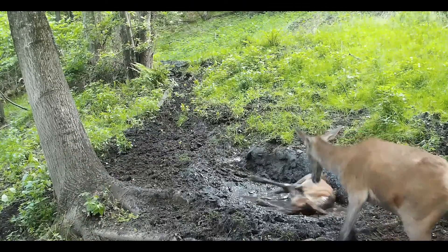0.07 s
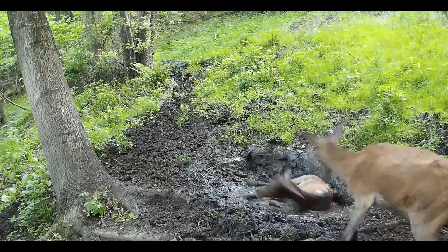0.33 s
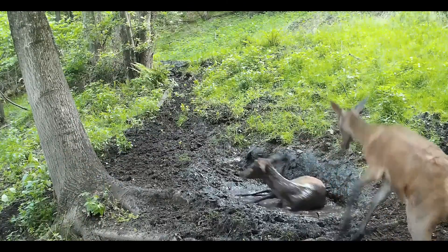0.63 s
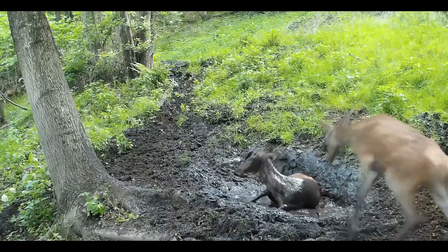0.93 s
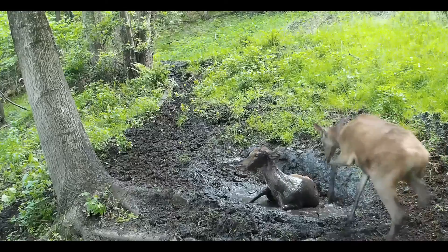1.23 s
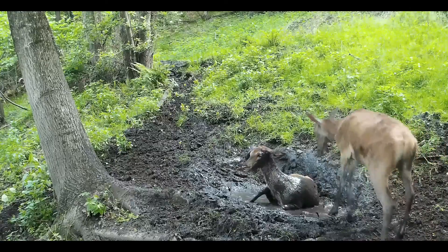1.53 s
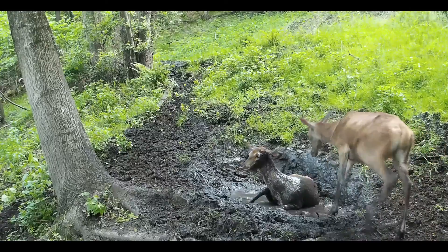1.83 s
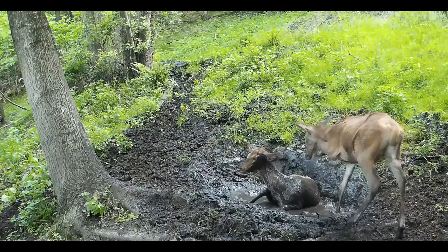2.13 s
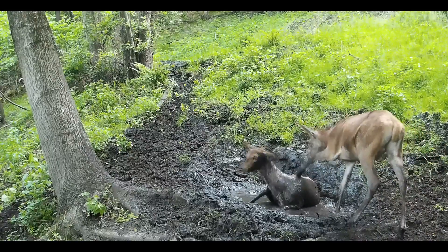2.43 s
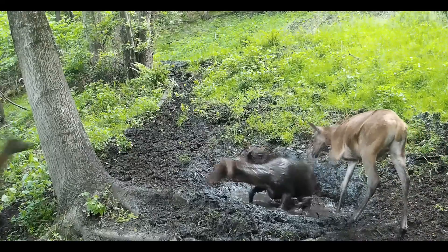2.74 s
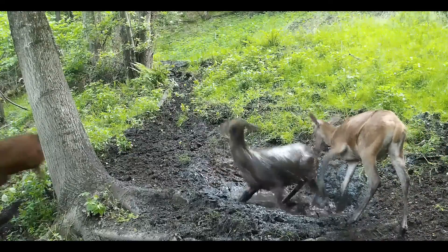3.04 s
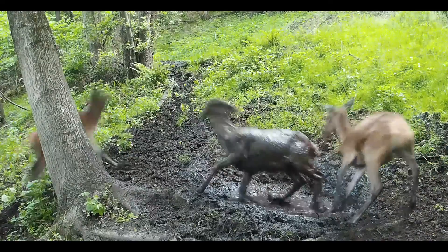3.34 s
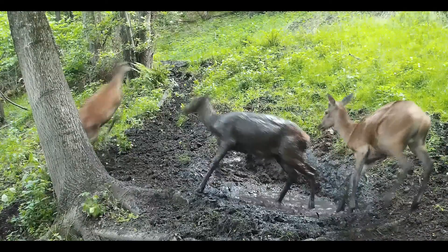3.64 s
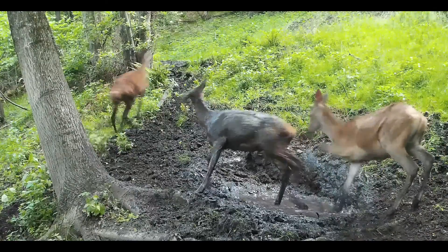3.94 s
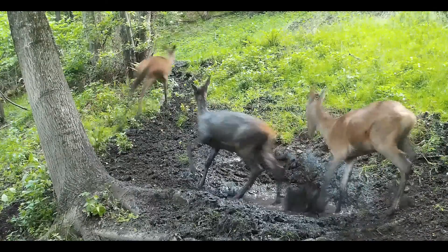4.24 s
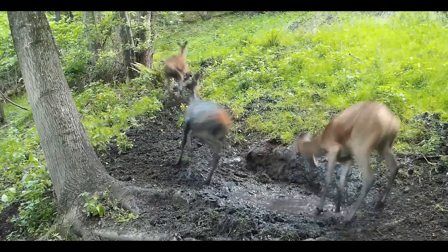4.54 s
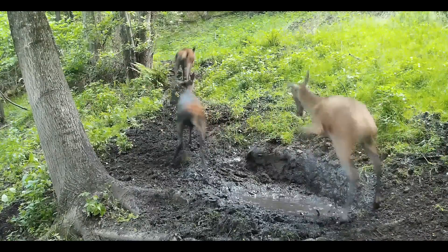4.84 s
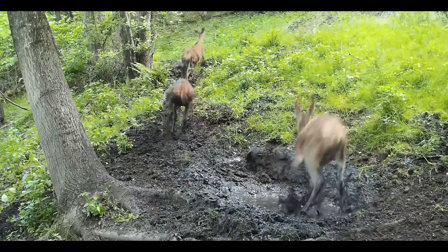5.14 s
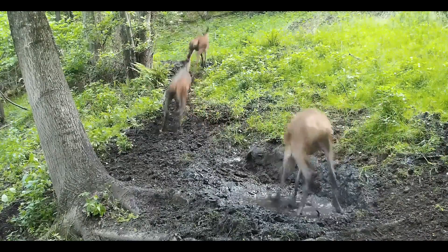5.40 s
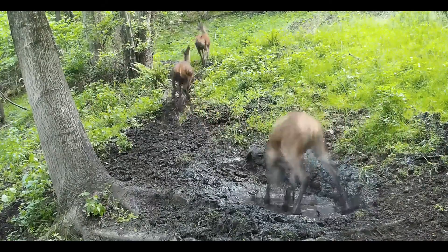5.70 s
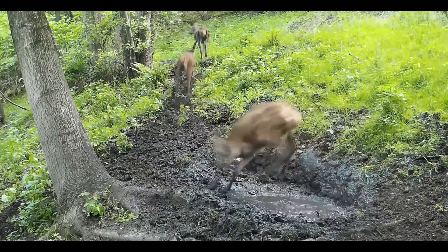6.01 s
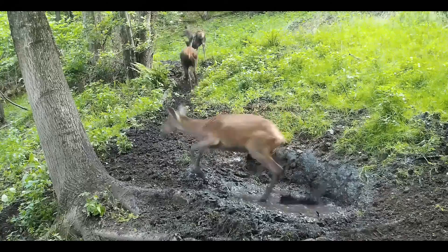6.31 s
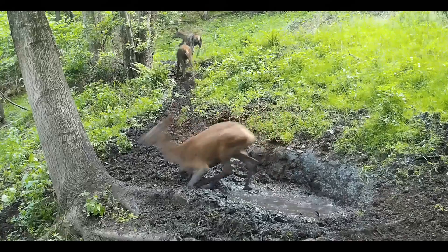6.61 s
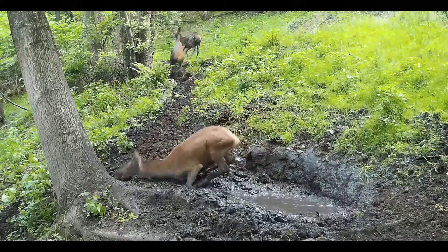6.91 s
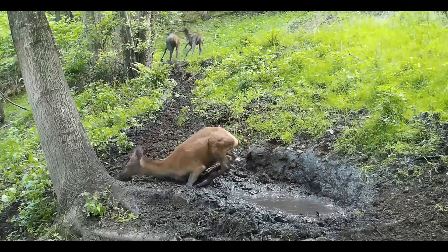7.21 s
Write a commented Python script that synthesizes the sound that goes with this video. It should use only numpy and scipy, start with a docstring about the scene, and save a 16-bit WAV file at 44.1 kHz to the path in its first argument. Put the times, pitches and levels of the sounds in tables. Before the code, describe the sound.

Deer wallow and scramble in a forest mud puddle, with wet slaps, sucking pops and sloshes over a soft hiss of leaves.

```python
"""Wet pops, slaps and sloshes: deer wallow and scramble in a forest mud puddle a few metres away.
Hooves slap the slurry and thud on soft ground. Suction pockets pop as their mud films tear, air gulps
up, flecks land, and the stirred mud crackles and gurgles. The trees answer faintly, over distant
birds, a steady hiss of leaves and a low rumble of air."""
import sys
import numpy as np
from scipy import signal
from scipy.fft import rfft, irfft, next_fast_len
from scipy.io import wavfile
from scipy.ndimage import map_coordinates

SR = 44100
rng = np.random.default_rng(int(sys.argv[2]) if len(sys.argv) > 2 else 0)


def int16_out(signal):
    """Quantize to a 16-bit WAV file."""
    q = np.round(np.clip(np.atleast_2d(signal).T, -1, 1) * 32767)
    wavfile.write(sys.argv[1], SR, q.astype(np.int16))


N = 324576

# Spectrum of mud films and drops. Each row: frequency in Hz, relative level in dB.
SPRAY_SPECTRUM = [(200, -29), (900, -27), (1800, -8.5), (2800, -5), (3200, 2), (4100, 0), (4600, 0.5),
                  (5100, 1.5), (6200, -1), (7200, -1), (9000, -9), (12000, -15), (15500, -23.5)]
# Spectrum of hollows in the mud. Each row: frequency in Hz, relative level in dB.
CAVITY_SPECTRUM = [(150, -19), (800, -19), (1100, -10.5), (1500, -5), (2200, -6.5), (2800, -12),
                   (6000, -41), (15000, -78)]


def amp(db):
    """Decibels to gain."""
    return 10 ** (np.asarray(db) / 20)


def unit(x):
    """Scale to rms 1."""
    return x / np.sqrt(np.mean(x ** 2) + 1e-20)


def along(points, hz):
    """(Hz, value) points read on a log axis."""
    knot_hz, values = np.transpose(points)
    return np.interp(np.log(hz + 1), np.log(knot_hz + 1), values)


def wobble(rate_hz, size=N):
    """Smooth random curve, rate_hz knots a second."""
    at = np.arange(size) * rate_hz / SR
    return map_coordinates(rng.standard_normal(size // 8 + 8), [at], mode="mirror")


def colour(x, spectrum, size=4096):
    """Minimum-phase filter; white noise keeps its power."""
    gain = amp(along(spectrum, np.fft.rfftfreq(size, 1 / SR)))
    cepstrum = irfft(np.log(gain))
    cepstrum[1:size // 2] *= 2
    cepstrum[size // 2 + 1:] = 0
    kernel = irfft(np.exp(rfft(cepstrum)))
    return signal.fftconvolve(x, kernel / np.linalg.norm(kernel))[:len(x)]


def add(track, start_s, sound):
    """Mix a sound into a track."""
    start = max(round(start_s * SR), 0)
    track[start:start + len(sound)] += sound[:max(N - start, 0)]


def strike(t, rise_s, t60_s):
    """Quick rise, exponential fall, peak 1."""
    shape = (1 - np.exp(-t / rise_s)) * amp(-60 * t / t60_s)
    return shape / shape.max()


def burst(envelope, spectrum, grit_db, grain_hz):
    """Coloured noise in clumped grains, with the energy of its envelope."""
    size = len(envelope)
    grains = envelope * rng.standard_normal(size) * amp(grit_db * wobble(grain_hz, size))
    return unit(colour(grains, spectrum)) * np.sqrt(np.mean(envelope ** 2))


def sized_spray(centre_hz, boost_db, log_width):
    """Spray spectrum with a hump for films or drops of one size; fine ones also lift the treble."""
    hz = np.geomspace(100, 16000, 70)
    hump_db = boost_db * np.exp(-(np.log(hz / centre_hz) / log_width) ** 2)
    fine_hz = 4530
    tilt_db_per_octave = 7.5 * max(np.log2(centre_hz / fine_hz), 0)
    lift_db = tilt_db_per_octave * np.maximum(np.log2(hz / fine_hz), 0)
    return np.column_stack([hz, along(SPRAY_SPECTRUM, hz) + hump_db + lift_db])


def sweeps(rows, waver):
    """Short, unsteady tones whose pitch bends ever faster."""
    track = np.zeros(N)
    for start_s, db, start_hz, end_hz, length_s in rows:
        u = np.linspace(0, 1, max(round(length_s * SR), 8))
        hz = start_hz * (end_hz / start_hz) ** (u ** 2) * (1 + waver * wobble(675, len(u)))
        swell = unit((1 - np.exp(-u / 0.071)) * (1 - u ** 3) * amp(2.0 * wobble(215, len(u))))
        add(track, start_s, amp(db - 1.5) * swell * np.sin(2 * np.pi * np.cumsum(hz) / SR))
    return track


def forest():
    """Leaves hiss steadily over a low rumble of moving air."""
    # Each row: frequency in Hz, relative level in dB.
    leaf_spectrum = [(12, -17), (20, -5.5), (70, 2), (148, -4), (213, -6.5), (333, -8), (534, -11),
                     (958, -17), (1580, -18), (3000, -16), (3540, -37), (3960, -13.5), (6540, -14.5),
                     (11100, -34.5), (15500, -37)]
    air_spectrum = [(20, -9.0), (45, 1.5), (110, -21.0), (250, -17.5), (700, -30.5)]
    # Each row: time in seconds, rumble level in dB.
    breeze = [(0.0, -59), (1.4, -54.5), (2.8, -55), (3.1, -47.5), (4.4, -53), (5.1, -54), (7.36, -56)]
    hiss = unit(colour(rng.standard_normal(N), leaf_spectrum)) * amp(-49.0 + 0.23 * wobble(4.04))
    air = unit(colour(rng.standard_normal(N), air_spectrum))
    air_db = np.interp(np.arange(N) / SR, *np.transpose(breeze)) + 1.5 * wobble(7)
    return hiss + air * amp(air_db)


def birds():
    """Faint chirps far off in the wood."""
    # Each row: start in seconds, level in dB, start and end pitch in Hz, length in seconds.
    chirps = [(.03, -50, 3640, 3380, .05), (.255, -53, 2750, 2920, 0.071), (.69, -52, 2380, 2300, 0.114)]
    return sweeps(chirps, waver=0.012)


def trees(x):
    """Trunks and foliage scatter a late tail."""
    # Each row: frequency in Hz, t60 in seconds.
    echo_decay = [(100, 0.2), (1500, 0.12), (5000, 0.18), (14000, 0.16)]
    hz, t, noise = signal.stft(rng.standard_normal(SR // 2), SR, nperseg=256)
    decay = amp(-60 * t / along(echo_decay, hz)[:, None])
    tail = signal.istft(noise * decay, SR, nperseg=256)[1]
    tail *= 1 - np.exp(-np.arange(len(tail)) / SR / 0.025)
    return signal.fftconvolve(x, tail / np.linalg.norm(tail))[:N]


def stirring_db(t):
    """How hard the deer stir the puddle: (mud, water) levels at times t."""
    # Each row: time in seconds, sticky mud level in dB, loose water level in dB.
    effort = [(0.0, -54, -57), (0.39, -41.5, -46.5), (0.92, -37.5, -43.5), (1.25, -43, -47),
              (1.6, -45, -56), (2.05, -37, -46.5), (2.33, -49, -56), (2.58, -36.5, -37), (2.9, -33.5, -40),
              (3.13, -27, -32), (3.4, -30.5, -38.5), (3.62, -36, -45), (4.02, -37, -44), (4.3, -32, -38),
              (4.68, -36.5, -43.5), (4.88, -39.5, -56), (5.02, -38.5, -37), (5.25, -29.5, -40.5),
              (5.72, -29.5, -33), (6.17, -37, -50), (6.35, -30.5, -43), (6.54, -42.5, -47.5),
              (7.03, -40, -45), (7.36, -49.5, -61)]
    time_s, mud_db, water_db = np.transpose(effort)
    return np.interp(t, time_s, mud_db), np.interp(t, time_s, water_db)


def spatter():
    """Flecks of mud land as thin, bright ticks; their level loosely follows the stirring."""
    track, t = np.zeros(N), np.arange(SR // 50) / SR
    fleck = strike(t, rise_s=0.0002, t60_s=0.012)
    for when, strength, fineness in rng.random((130, 3)):
        drop = sized_spray(9500 * 2 ** (fineness - 0.5), boost_db=7, log_width=0.22)
        tick = burst(fleck, drop, grit_db=-2.0, grain_hz=1100)
        add(track, when * N / SR, amp(10 * strength) * tick)
    mud_db, _ = stirring_db(np.arange(N) / SR)
    return unit(track) * amp(-57.5 + 0.71 * (mud_db - mud_db.mean()))


def bubbles(centre_hz, log_spread, cycles, glide, spread_db, count, size=1500):
    """Damped bubbles, each rising in pitch as it nears the surface; rms 1."""
    start = rng.integers(0, N, (count, 1))
    hz = centre_hz * np.exp(log_spread * rng.standard_normal((count, 1)))
    strength = amp(spread_db * np.minimum(rng.exponential(size=(count, 1)), 3))
    age = hz * np.arange(size) / SR / cycles
    phase = 2 * np.pi * cycles * age * (1 + glide * age / 2)
    ring = strength * age * np.exp(-4 * age) * np.sin(phase)
    return unit(np.bincount((start + np.arange(size)).ravel(), ring.ravel(), N)[:N])


def crackle(tear_count=700):
    """Tiny sticky films tear in brief rasps, amid fizz and droplets."""
    fizz = unit(rng.standard_normal(N) * amp(0.23 * wobble(750) + 2.7 * wobble(55)))
    starts = rng.integers(0, N, tear_count)
    strength = amp(4 * np.minimum(rng.exponential(size=tear_count), 3))
    tear_power = np.bincount(starts, strength ** 2, N)
    rasp = strike(np.arange(SR // 40) / SR, rise_s=0.00028, t60_s=0.014)
    envelope = np.sqrt(np.abs(signal.fftconvolve(tear_power, rasp ** 2)[:N]))
    ticks = unit(envelope * rng.standard_normal(N))
    droplets = bubbles(4430, log_spread=0.39, cycles=23, glide=0.17, spread_db=8.5, count=1500, size=400)
    return colour(amp(-3.5) * fizz + 0.44 * ticks, SPRAY_SPECTRUM) + amp(-9.5) * droplets


def slosh():
    """Loose water washes about with small bubbles."""
    wash = unit(colour(rng.standard_normal(N) * amp(3.74 * wobble(70)), CAVITY_SPECTRUM))
    froth = bubbles(1780, log_spread=0.219, cycles=14.4, glide=0.09, spread_db=5.5, count=1000)
    return amp(-2.5) * wash + amp(-6.5) * froth


def gurgle():
    """Large bubbles, strongest while a body rolls in the puddle or heaves out."""
    # Each row: time in seconds, level in dB.
    heaves = [(0.0, -57), (0.6, -61), (0.88, -47), (1.25, -51.5), (1.6, -54.5), (2.4, -54.5), (2.64, -46.5),
              (2.95, -57), (3.18, -42), (3.4, -50.5), (4.9, -57), (5.8, -48), (7.36, -60.5)]
    db = np.interp(np.arange(N) / SR, *np.transpose(heaves))
    stream = bubbles(671, log_spread=0.352, cycles=5.2, glide=0.21, spread_db=2.5, count=1200)
    return amp(db - 3) * stream


def churn():
    """Stirred mud crackles, water sloshes and large bubbles gurgle."""
    mud_db, water_db = stirring_db(np.arange(N) / SR)
    return amp(mud_db - 3.5) * crackle() + amp(water_db - 2.0) * slosh() + gurgle()


def gulps(mean_octaves_per_s=35.4):
    """Air pockets shrink as they surface, so their pitch climbs; long ones sweep furthest."""
    # Each row: start in seconds, level in dB, start pitch in Hz, length in seconds.
    air_pockets = [(0.694, -37.5, 2000, 0.008), (0.748, -34.5, 1530, 0.0041), (0.856, -39.5, 545, 0.012),
                   (1.079, -36, 1275, 0.016), (1.172, -37, 1620, 0.01), (2.495, -32.5, 1160, 0.006),
                   (2.639, -33, 1670, 0.01), (2.668, -31, 1080, 0.013), (3.134, -33, 500, 0.0089),
                   (3.183, -32, 410, 0.028), (3.206, -33.5, 686, 0.025), (3.322, -30, 1170, 0.018),
                   (4.631, -30, 1220, 0.01), (5.125, -26, 380, 0.052), (5.224, -26.5, 1550, 0.0093),
                   (5.742, -33.5, 454, 0.018), (5.774, -40, 572, 0.0286), (5.802, -31, 1960, 0.012),
                   (5.929, -25.5, 1330, 0.01), (6.683, -27, 1320, 0.002)]
    rows = [(start_s, db, hz, hz * 2 ** (mean_octaves_per_s * length_s), length_s)
            for start_s, db, hz, length_s in air_pockets]
    return sweeps(rows, waver=0.066)


def thuds():
    """Mud squashes under a hoof; the soft ground gives for a few slow swings."""
    # Each row: start in seconds, squash level in dB, ground push level in dB.
    landings = [(0.201, -30, -56), (0.593, -33.5, -50), (0.946, -45, -43), (1.219, -29, -60),
                (1.25, -37, -46), (2.27, -41, -46), (2.951, -24.5, -60), (3.261, -37, -42),
                (3.708, -27.5, -59), (3.952, -34.5, -62), (4.076, -37, -37), (4.237, -42.5, -42),
                (4.97, -30.5, -54), (5.027, -30, -58), (5.576, -32, -48), (6.027, -19.5, -38),
                (6.232, -19.5, -41), (6.285, -17, -27), (6.481, -38.5, -38.5)]
    # Each row: frequency in Hz, relative level in dB.
    squash_spectrum = [(40, -22), (130, -4), (250, -2.5), (420, -2), (700, -4), (1200, -12.5), (3000, -77)]
    track, t = np.zeros(N), np.arange(SR // 4) / SR
    for start_s, squash_db, push_db in landings:
        squash = burst(strike(t, rise_s=0.0012, t60_s=0.062), squash_spectrum, grit_db=1.5, grain_hz=266)
        ground_hz = 94 * np.exp(0.012 * rng.standard_normal())
        push = strike(t, rise_s=0.0027, t60_s=0.047) * np.sin(2 * np.pi * ground_hz * t)
        add(track, start_s, amp(squash_db - 5) * squash + amp(push_db + 6) * push)
    return track


def slaps():
    """A limb smacks the slurry, opens a hollow and throws spray that patters back."""
    # Each row: start in seconds, level in dB, cavity offset in dB, drop pitch in Hz, t60 in seconds.
    impacts = [(0.4241, -23, -15, 5850, 0.081), (0.6423, -25, -19, 5000, 0.14),
               (0.8438, -35.5, 2, 3320, 0.045), (1.269, -21, -16, 5220, 0.13),
               (1.7963, -14, -34, 3650, 0.08), (1.815, -18, -9, 5900, 0.033), (2.146, -22, -26, 6100, 0.11),
               (2.6, -19, -11.5, 5380, 0.11), (2.6673, -34, -1, 3310, 0.076),
               (2.7472, -13.5, -30, 6000, 0.15), (2.7785, -18, -14, 3580, 0.16),
               (2.8353, -15, -17, 3190, 0.097), (2.9274, -12.5, -30, 5730, 0.1),
               (2.9433, -14, -10.5, 3370, 0.14), (3.1643, -3.5, -21.5, 4930, 0.092),
               (3.4023, -14, -9.5, 4250, 0.041), (3.497, -17, -13, 3190, 0.11),
               (3.7055, -8.5, -12, 5300, 0.08), (3.7185, -12.5, -41, 6400, 0.13),
               (4.0751, -2.5, -21, 5900, 0.14), (4.3127, -22, -9.5, 5330, 0.032),
               (4.4092, -14.5, -18, 5850, 0.053), (4.6318, -28.5, -2, 3670, 0.047),
               (4.9583, -1, -17.5, 3940, 0.085), (4.9706, -10, -16, 5000, 0.056),
               (5.01, -13.5, -10, 5950, 0.068), (5.3633, -11, -15.5, 3330, 0.15),
               (5.5763, -3.5, -21, 3270, 0.065), (5.607, -16, -13, 3390, 0.082),
               (5.9077, -7, -21, 5070, 0.11), (5.921, -12, -13.5, 4500, 0.1),
               (6.03, -1.5, -12.5, 3520, 0.038), (6.049, -15, -9, 3180, 0.21),
               (6.111, -24, -6.5, 4010, 0.12), (6.2673, -10, -29, 3610, 0.069),
               (6.2847, -9, -8, 2970, 0.057), (6.328, -15.5, -10.5, 3610, 0.081),
               (6.4685, -25, -32, 7370, 0.073), (6.529, -23, -15, 3500, 0.063),
               (6.605, -28, -5.5, 3390, 0.071), (6.7508, -22.5, -9.5, 7200, 0.097),
               (6.928, -19.5, -15, 3450, 0.032), (7.3005, -29, -4, 5140, 0.17),
               (7.3291, -16, -15, 3600, 0.23)]
    track, t = np.zeros(N), np.arange(SR // 3) / SR
    for start_s, db, cavity_db, drop_hz, t60_s in impacts:
        drops = sized_spray(drop_hz, boost_db=4.5, log_width=0.095)
        smack = burst(strike(t, rise_s=0.0032, t60_s=t60_s), drops, grit_db=3.5, grain_hz=410)
        patter = burst(strike(t, rise_s=0.0067, t60_s=0.32), SPRAY_SPECTRUM, grit_db=4.0, grain_hz=197)
        hollow = burst(strike(t, rise_s=0.006, t60_s=t60_s), CAVITY_SPECTRUM, grit_db=7.0, grain_hz=241)
        splash = smack + amp(-12.5) * patter
        add(track, start_s, amp(db - 12) * splash + amp(db + cavity_db - 4) * hollow)
    return track


def small_pockets(rate_per_s=4.3):
    """Rows for pops(): lesser pockets open at random, louder where the mud is stirred harder."""
    rows = []
    for when, strength, depth, pitch, film in rng.uniform(-1, 1, (round(rate_per_s * N / SR), 5)):
        start_s = (when + 1) / 2 * N / SR
        mud_db, _ = stirring_db(start_s)
        db, cavity_db = mud_db + 11.5 + 5 * strength, -17.5 + 8 * depth
        cavity_hz, film_hz = 1715 * 2 ** (pitch / 2), 5500 * 2 ** (film / 2)
        rows.append((start_s, db, cavity_db, cavity_hz, film_hz))
    return rows


def pops():
    """A mud film stretches and tears with a tick; the pocket behind rings, rising as it opens."""
    # Each row: start in seconds, level in dB, cavity offset in dB, cavity and film pitch in Hz.
    main_pockets = [(0.201, -18.5, -10, 1120, 3240), (0.4793, -23.5, -12, 1780, 5010),
                    (0.5934, -19.5, -5, 2100, 3180), (0.6083, -17, -35, 2240, 6200),
                    (0.641, -13.5, -30, 2020, 5100), (0.7673, -27.5, -4, 1850, 3570),
                    (1.0976, -13, -13.5, 1840, 4840), (1.2222, -14, -14, 1110, 6300),
                    (1.279, -10.5, -30, 2260, 5340), (1.5355, -17, -28, 1490, 6750),
                    (1.6103, -20.5, -32, 2250, 5770), (1.8005, -12.5, -13.5, 2200, 7450),
                    (2.053, -18, -23, 1270, 5630), (2.089, -31, -2, 2260, 3080),
                    (2.0998, -18, -27, 2390, 7700), (2.256, -4, -11.5, 1480, 4530),
                    (2.416, -33.5, 3, 1400, 3510), (2.445, -18.5, -13.5, 1830, 4830),
                    (2.8469, -10.5, -10.5, 2300, 3520), (2.9518, -9.5, -4, 1540, 3310),
                    (3.0253, -10.5, -12, 1900, 2960), (3.262, -5, -22, 1650, 7340),
                    (3.2721, -8.5, -18, 1870, 6000), (3.477, -6, -16, 1500, 4860),
                    (3.7606, -5.5, -20.5, 2280, 5700), (3.7735, -8, -24, 2100, 5880),
                    (3.9515, -11, -17, 2240, 6760), (3.9995, -12, -21.5, 1320, 4740),
                    (4.0824, 3.5, -18.5, 1410, 3220), (4.1141, -13, -3.5, 1570, 3230),
                    (4.205, -12.5, -36, 1350, 6870), (4.344, -13.5, -8.5, 1810, 4040),
                    (4.4157, -12.5, -25, 1450, 5730), (4.7705, -12, -27, 1290, 5600),
                    (4.8574, -14.5, -17.5, 1380, 6800), (4.882, -12, -30, 1520, 6000),
                    (4.9304, -13, -22, 1880, 4970), (4.9625, 4, -37, 2140, 3940),
                    (5.027, -2.5, -13.5, 1580, 3370), (5.114, -13, -34, 1610, 7050),
                    (5.1713, 3.5, -26, 2440, 5900), (5.3495, -1.5, -24, 1840, 3400),
                    (5.3788, -2.5, -20, 1600, 3330), (5.4188, -4.5, -13, 1880, 3580),
                    (5.5854, -1, -18, 1660, 4100), (5.7196, -14.5, -4.5, 2060, 3480),
                    (6.0123, -1.5, -20.5, 1690, 7360), (6.2326, 3, -23, 1800, 6600),
                    (6.2676, 0.5, -25, 1600, 3650), (6.2745, -0.5, -26, 1650, 5960),
                    (6.62, -32, -8, 2270, 3230), (6.8007, -17, -20, 2090, 5540),
                    (6.949, -31, 4, 1420, 3480)]
    track, t = np.zeros(N), np.arange(SR // 20) / SR
    crack = amp(0.5) * strike(t, rise_s=0.00023, t60_s=0.0034)
    tear = crack + strike(t, rise_s=0.00022, t60_s=0.023)
    for start_s, db, cavity_db, cavity_hz, film_hz in main_pockets + small_pockets():
        film = sized_spray(film_hz, boost_db=8.0, log_width=0.16)
        tick = burst(tear, film, grit_db=5.0, grain_hz=1500)
        squelch = burst(strike(t, rise_s=0.0002, t60_s=0.039), CAVITY_SPECTRUM, grit_db=-3, grain_hz=920)
        ring = strike(t, rise_s=0.00078, t60_s=0.015) * np.sin(2 * np.pi * cavity_hz * t * (1 + 4 * t))
        cavity = 0.7 * squelch + 1.32 * ring
        add(track, start_s, amp(db - 15.5) * tick + amp(db + cavity_db - 4) * cavity)
    return track


def scene():
    """The puddle and its faint echo in the forest, mono."""
    puddle = pops() + slaps() + thuds() + churn() + spatter() + gulps()
    return (puddle + amp(-11.0) * trees(puddle) + birds() + forest())[None]


def record(dry):
    """Round off peaks near full scale, then low-pass steeply."""
    limited = dry / (1 + np.abs(dry) ** 6) ** (1 / 6)
    size, cutoff_hz = next_fast_len(N + SR // 4), 15600
    hz = np.fft.rfftfreq(size, 1 / SR)
    return irfft(rfft(limited, size) / (1 + (hz / cutoff_hz) ** 120), size)[..., :N]


dry = scene()
out = record(dry)
int16_out(out)
```